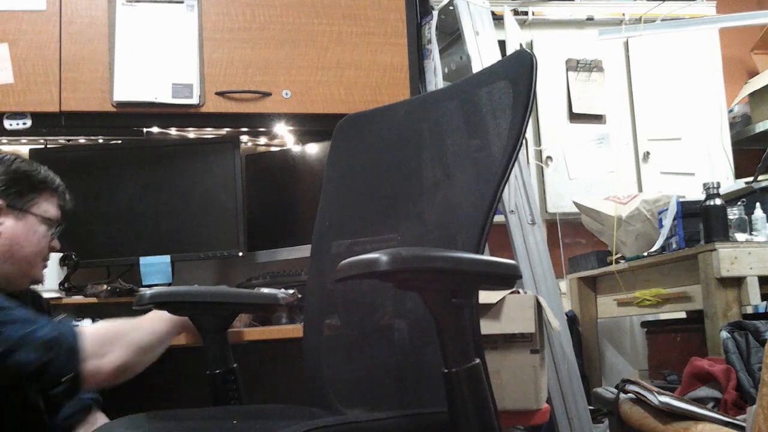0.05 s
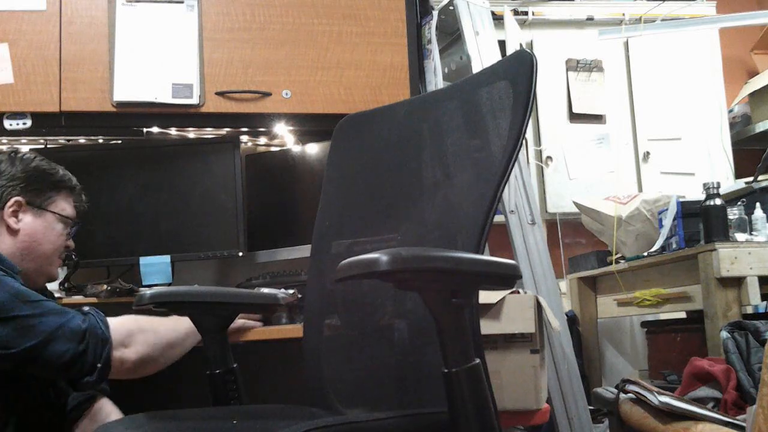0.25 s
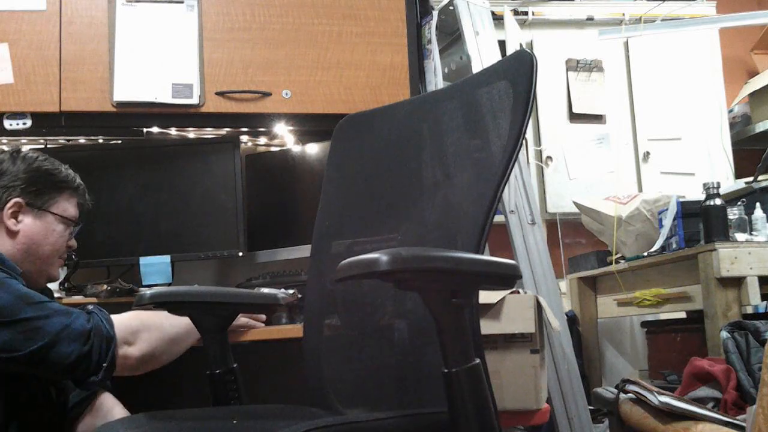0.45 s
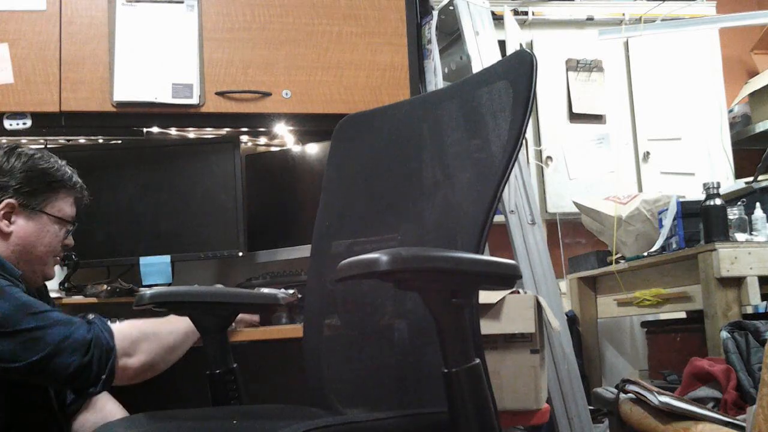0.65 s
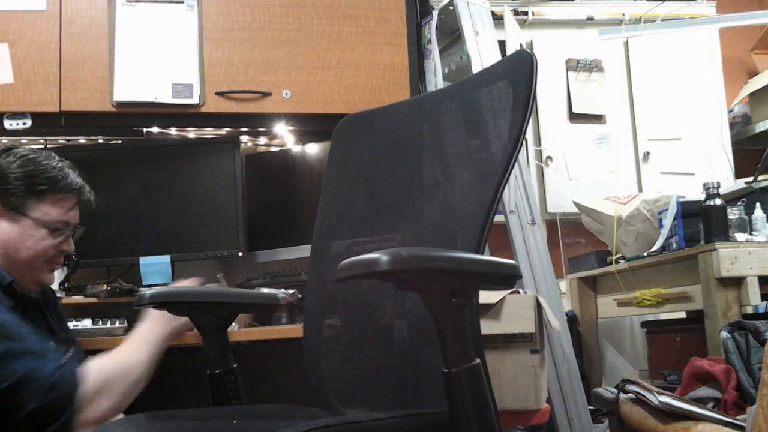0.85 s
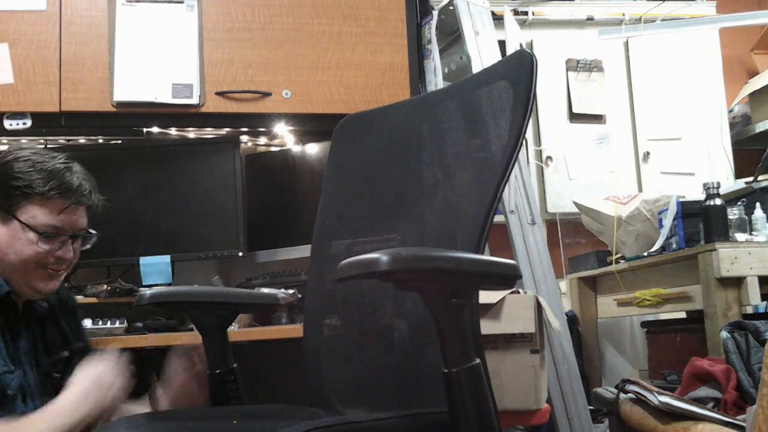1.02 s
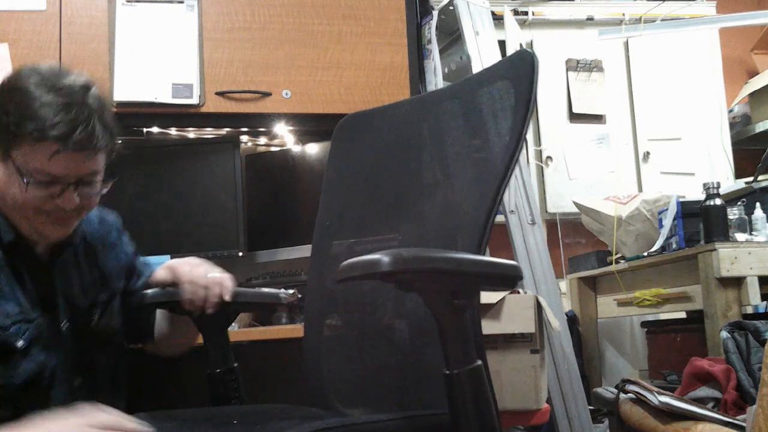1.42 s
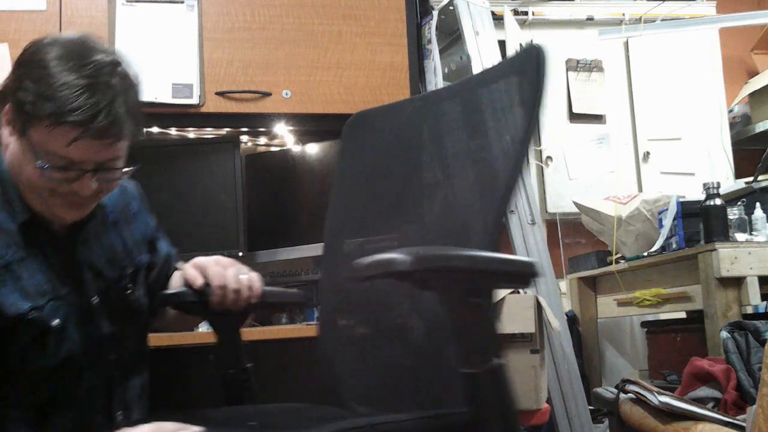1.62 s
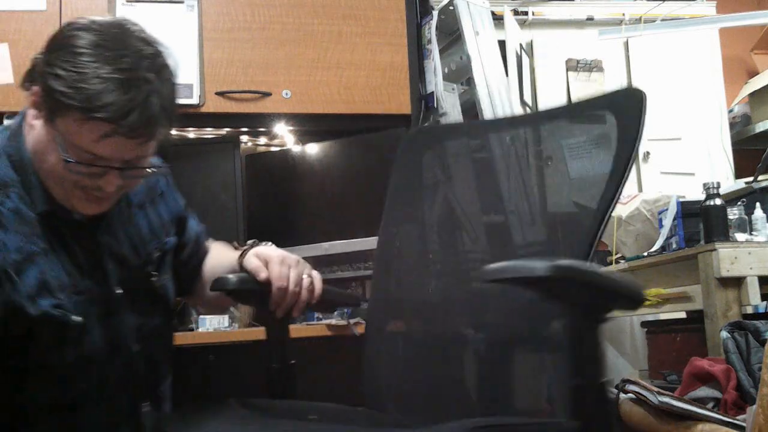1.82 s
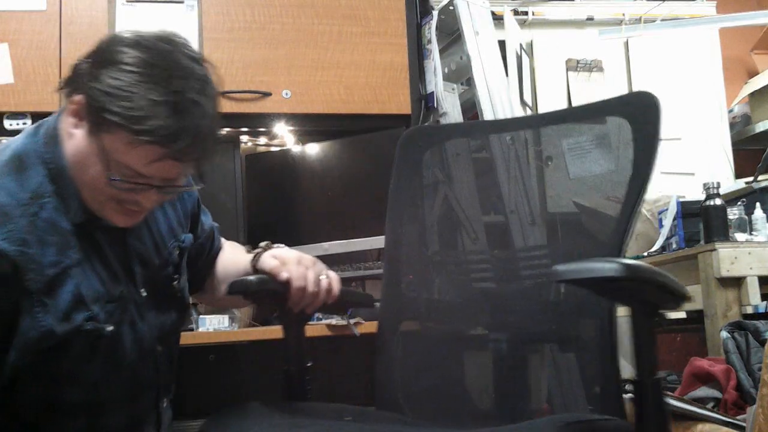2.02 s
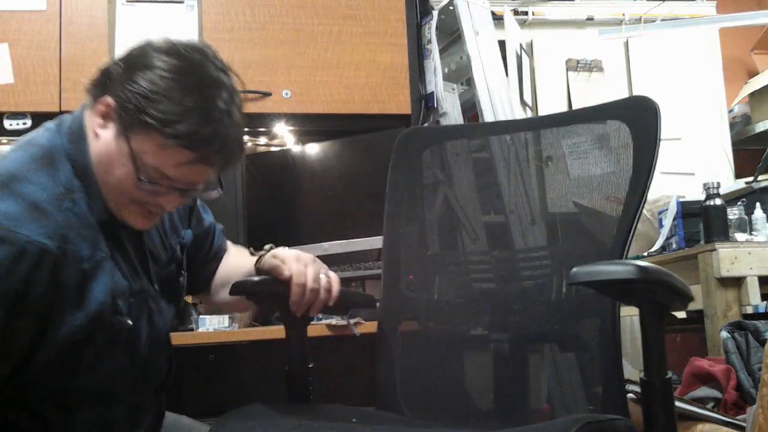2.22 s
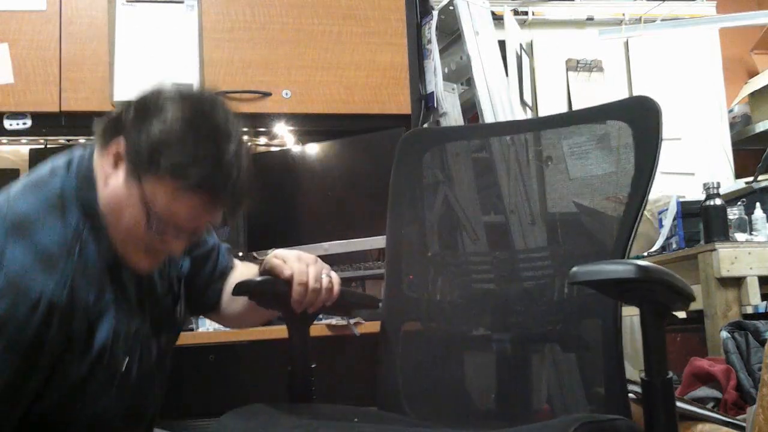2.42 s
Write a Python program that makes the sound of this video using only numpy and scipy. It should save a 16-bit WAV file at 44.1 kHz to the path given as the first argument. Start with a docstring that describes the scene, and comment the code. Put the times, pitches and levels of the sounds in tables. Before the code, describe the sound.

Office chair knocking and rattling as it is shoved, following a few thumps nearby.

```python
"""A wheeled office chair is handled in a small, cluttered workshop. First something thumps and clatters
down by the desk; then a hand grabs the hollow armrest, the loose frame clunks as the chair is shoved,
and it knocks hard with a metal clink. Each clunk is a dull crack, a rattle and a ringing body, with a
short room tail. The casters roll briefly over grit and rumble through the floor, over quiet room air."""
import sys
import numpy as np
from scipy import signal
from scipy.fft import rfft, irfft
from scipy.io import wavfile

SR = 44100
rng = np.random.default_rng(int(sys.argv[2]) if len(sys.argv) > 2 else 0)


def transcribe(u):
    """Save the signal u as a 16-bit wav file named by the first command-line argument.

    u: samples, shape (n,) or (channels, n), limited to [-1, 1]; the rate is SR.
    q: integer samples, one column per channel.
    """
    v = np.clip(np.atleast_2d(u).T, -1, 1)
    q = np.round(v * 32767).astype(np.int16)
    wavfile.write(sys.argv[1], SR, q)


N = 112454

# resonances of the chair frame (frequency [Hz], level [dB], t60 [s])
CHAIR_MODES = [(127.3, -8, 0.26), (301.8, -1, 0.46), (344, -8.5, 0.43), (416, -2.5, 0.58),
               (492.6, -6.5, 0.42), (519, 0.5, 0.41), (645.5, 0.5, 0.41), (825, -0.5, 0.41),
               (1320, -12, 0.63), (1470, -3, 0.21), (1587, -6.5, 0.15), (1784, -9.5, 0.35),
               (1893, -8.5, 0.33)]


def chair_clunks():
    """The loose frame knocks, rattles and rings as the chair is grabbed and shoved."""
    # (time [s], level [dB], bass [dB], treble [dB], favoured pitch [Hz], crack [dB])
    hits = [(1.4815, -45.5, -23, -0.5, 1590, 18), (1.573, -58, -7, 7.5, 1490, 13.5),
            (1.639, -56.5, -2.5, 9, 1500, 19), (1.659, -32.5, -30, -11, 1520, 18.5),
            (1.675, -38, -20.5, -6.5, 664, 24), (1.693, -39, -8.5, -10, 627, 28),
            (1.746, -40, -15.5, 4, 1500, 21), (1.7605, -30, -15.5, -3, 996, 20.5),
            (1.773, -39.5, -12.5, -0.5, 583, 29), (1.797, -38, 1.5, 2.5, 443, 23.5),
            (1.809, -46.5, 3.5, -6, 504, 31.5), (1.8695, -30.5, 1, 4.5, 1525, 21),
            (1.876, -33.5, 5, 11, 333, 21), (1.884, -31, 1, 7, 708, 21.5),
            (1.908, -35.5, -4.5, -8, 538, 28.5), (1.957, -38.5, 0.5, 3.5, 667, 20.5),
            (1.983, -39.5, 1.5, 3, 645, 21.5), (2.068, -39.5, 1.5, -22, 516, 25.5),
            (2.099, -38.5, -4, -25, 427, 19), (2.337, -50, 2.5, -2.5, 612, 13),
            (2.356, -53.5, 7.5, 4, 745, 14), (2.474, -58.5, -6, 4.5, 1530, 15)]
    # tone of a knock on the frame (frequency [Hz], level [dB])
    body_eq = [(40, -12.5), (85, -32), (200, -1), (330, 0.5), (560, 3), (880, -1.5), (1200, -6),
               (1620, -5.5), (2150, -17), (2700, -21), (3050, -32.5), (3700, -35), (5000, -60),
               (7500, -61.5)]
    return blows(hits, body_eq, CHAIR_MODES, rattle_db=-6, rattle_s=0.028,
                 room_db=-6, t60_scale=0.93, modes_db=-12)


def armrest():
    """The hollow armrest rings when the hand lands on it and again when it is shoved."""
    # armrest resonances (frequency [Hz], level [dB], t60 [s])
    modes = [(734, -9, 0.58), (885, 0, 0.45), (960, -2.5, 0.2), (1610, -9, 0.17)]
    # grab and shove (time [s], level [dB])
    knocks = [(1.4817, -46.5), (1.7606, -38)]
    out, t = np.zeros(N), np.arange(SR) / SR
    for at, db in knocks:
        add(out, undb(db) * ring(modes, t), at)
    return out


def clink(level_db=-60.5, jangle_db=15, jangle_t60=0.27, size=22050):
    """The metal of the chair's mechanism rings and jangles briefly at the hardest knock."""
    # resonances of the metal and, near 2790 and 3320 Hz, of the plastic frame (frequency [Hz], level [dB], t60
    # [s])
    modes = [(2344, 11.5, 0.37), (2710, 11.5, 0.25), (2790, 9, 0.14), (3320, 6.5, .28), (3630, 0.5, 0.22),
             (7130, -3, 0.24), (7800, -9.5, 0.22)]
    # bright tone of the jangle (frequency [Hz], level [dB])
    jangle_eq = [(1400, -10.5), (2400, 10), (3050, -4), (3600, -0.5), (5000, -25), (7100, -12), (8400, -21)]
    out, t = np.zeros(N), np.arange(size) / SR
    jangle = colour(rng.standard_normal(N), jangle_eq)[:size] * decay(t, jangle_t60)
    metal = ring(modes, t, detune=0.00058) + undb(jangle_db) * jangle
    attack = 1 - np.exp(-t / 0.0013)
    add(out, undb(level_db) * metal * attack, at=1.872)
    return out


def casters(bumps_per_s=160, spread_db=2, modes_db=-15, size=16384):
    """The wheels run over grit; each bump rings the frame and the room."""
    # swell of the roll (time [s], level [dB])
    swell = [(1.48, -63), (1.72, -52), (1.86, -53), (1.98, -45), (2.11, -49), (2.24, -58), (2.28, -57.5),
             (2.35, -50.5), (2.43, -58.5), (2.55, -74)]
    # tone of the wheels (frequency [Hz], level [dB])
    wheel_eq = [(60, -16.5), (140, -8), (300, -3.5), (520, -0.5), (800, 4), (1150, -12), (1600, -8),
                (2600, -25), (8000, -64.5)]
    t = np.arange(size) / SR
    grit = rng.random(N) < bumps_per_s / SR
    bumps = grit * undb(spread_db * rng.standard_normal(N)) * rng.choice([-1, 1], N)
    rolling = colour(signal.fftconvolve(bumps, reflections(t, t60_scale=0.44))[:N], wheel_eq)
    frame = unit(signal.fftconvolve(bumps, ring(CHAIR_MODES, t))[:N])
    return (rolling + undb(modes_db) * frame) * fader(swell)


def floor_rumble():
    """The floor rumbles under the rolling chair."""
    # swell of the rumble (time [s], level [dB])
    swell = [(1.66, -83), (1.70, -58), (1.78, -58.5), (1.85, -65), (1.885, -47), (1.93, -42.5), (1.99, -52),
             (2.17, -60), (2.26, -71.5)]
    # sub-bass tone of the floor (frequency [Hz], level [dB])
    floor_eq = [(15, -10.5), (28, 3), (47, 5), (80, -13.5), (200, -66)]
    return colour(rng.standard_normal(N), floor_eq) * fader(swell)


def desk_clatter():
    """Something lands by the desk: bassy thumps, then a run of brighter knocks."""
    # (time [s], level [dB], bass [dB], treble [dB], favoured pitch [Hz], crack [dB])
    hits = [(.213, -41.5, 12.5, -17, 293, 12.5), (.223, -37, 10, -25, 628, 11.5),
            (.238, -38.5, 4, -19, 290, 10), (.284, -44, 13.5, -5.5, 322, 15),
            (.3445, -34.5, 2.5, 2, 705, 5), (.362, -36, -5.5, 5.5, 723, 8), (.392, -33, -4, 0.5, 810, 11),
            (.396, -37.5, -6.5, 0, 521, 23.5), (.402, -30.5, -12.5, 5.5, 497, 24),
            (.410, -32, -10.5, 9, 1010, 25.5), (.428, -44.5, -10, 4.5, 726, 28.5),
            (.483, -47.5, -6, 6, 1570, 16), (.507, -43, -6.5, -0.5, 890, 18),
            (.535, -44.5, -1, 5, 910, 11.5), (.925, -58, -4.5, -8, 493, 6)]
    # tone of a knock by the desk (frequency [Hz], level [dB])
    body_eq = [(40, -31.5), (140, -12), (300, -12.5), (480, -2.5), (750, 1), (1080, -3.5), (1270, -8.5),
               (1580, -5.5), (2050, -20.5), (2700, -23), (3200, -35.5), (4800, -56), (7500, -59.5)]
    # resonances of the clatter (frequency [Hz], level [dB], t60 [s])
    modes = [(283.6, -7.5, 0.29), (474, -2.5, 0.47), (702, -0.5, 0.35), (776, -3.5, 0.39),
             (862, -0.5, 0.39), (1008.4, -2, 0.41), (1090, -10, 0.41), (1512, -7, 0.26), (1601, -3, .33),
             (1870, -9, 0.25), (2645, -11, 0.4)]
    return blows(hits, body_eq, modes, rattle_db=-5.5, rattle_s=0.009,
                 room_db=-4.5, t60_scale=1.1, modes_db=-14.5)


def blows(hits, body_eq, modes, rattle_db, rattle_s, room_db, t60_scale, modes_db, size=32768):
    """Each blow: a dull crack, a brief rattle of loose parts, ringing modes and the room's echoes."""
    out, t, hz = np.zeros(N), np.arange(size) / SR, np.arange(size // 2 + 1) * SR / size
    body = unit(undb(along_hz(body_eq, hz)))
    crack = causal(1 / np.sqrt(1 + (hz / 2830) ** 6))  # a click, low-passed at 2830 Hz
    attack = 1 - np.exp(-(t / 0.0025) ** 2)
    for at, db, *touch, crack_db in hits:
        echoes = undb(room_db) * reflections(t, t60_scale)
        rattle = undb(rattle_db) * rng.standard_normal(size) * np.exp(-t / rattle_s)
        tone = causal(body * undb(contact(hz, *touch, lift_db=7, octaves=0.27)))
        knock = irfft((undb(crack_db) * crack + rfft(echoes + rattle)) * tone)
        struck = [(f, level + contact(f, *touch, lift_db=11, octaves=0.13), t60) for f, level, t60 in modes]
        add(out, undb(db) * (knock + undb(modes_db) * ring(struck, t) * attack), at)
    return out


def contact(hz, bass_db, treble_db, centre_hz, lift_db, octaves, bass_hz=360, treble_hz=1340):
    """EQ in dB: a heavy contact adds bass, a hard one treble; the spot struck favours one pitch."""
    spot = lift_db * np.exp(-(np.log2(np.maximum(hz, 1) / centre_hz) / octaves) ** 2)
    return spot + bass_db / (1 + (hz / bass_hz) ** 4) + treble_db * hz ** 2 / (hz ** 2 + treble_hz ** 2)


def ring(modes, t, detune=0.0025):
    """Damped modes of alternating sign, slightly retuned on each blow."""
    out = np.zeros(len(t))
    for k, (hz, db, t60) in enumerate(modes):
        pitch = hz * (1 + detune * rng.standard_normal())
        out += (-1) ** k * undb(db) * decay(t, t60) * np.sin(2 * np.pi * pitch * t)
    return out


def reflections(t, t60_scale, bands=7):
    """Dense echoes of the room, dying band by band."""
    # room decay before scaling (frequency [Hz], t60 [s])
    room_t60 = [(100, 0.41), (400, 0.43), (900, 0.36), (2000, 0.4), (4000, 0.37), (8000, 0.057)]
    hz = np.arange(len(t) // 2 + 1) * SR / len(t)
    centres = np.geomspace(room_t60[0][0], room_t60[-1][0], bands)
    tail, noise = np.zeros(len(t)), rfft(rng.standard_normal(len(t)))
    for centre, share in zip(centres, np.eye(bands)):
        band = irfft(noise * along_hz(np.c_[centres, share], hz))
        tail += band * decay(t, t60_scale * along_hz(room_t60, centre))
    return tail


def room_air():
    """A quiet, dark bed of noise that drifts a little in level."""
    # room tone (frequency [Hz], level [dB])
    air_eq = [(15, 1), (75, -5), (130, -7), (250, -11), (450, -13.5), (750, -9.5), (1100, -18), (2000, -23),
              (3200, -29.5), (5000, -43), (7200, -40), (8500, -51)]
    # slow drift (time [s], level [dB])
    drift = [(0, -60), (1.4, -62), (2.55, -59)]
    return colour(rng.standard_normal(N), air_eq) * fader(drift)


def undb(db):
    """Decibels to gain."""
    return 10 ** (np.asarray(db) / 20)


def unit(x):
    """Scale to rms 1."""
    return x / np.sqrt(np.mean(x ** 2))


def decay(t, t60):
    """Envelope that falls 60 dB in t60 seconds."""
    return np.exp(-np.log(1000) * t / t60)


def along_hz(points, hz):
    """Read (frequency [Hz], value) points on a log-frequency axis."""
    f, v = np.array(points, float).T
    return np.interp(np.log(np.maximum(hz, 1)), np.log(f), v)


def fader(points):
    """Gain from (time [s], level [dB]) points; silent before the first."""
    return undb(np.interp(np.arange(N) / SR, *np.array(points).T, left=-np.inf))


def add(out, x, at):
    """Mix x into out from a time on."""
    i = int(at * SR)
    out[i:i + len(x)] += x[:N - i]


def colour(x, eq):
    """Shape a steady sound by an EQ curve; rms 1."""
    hz = np.arange(N // 2 + 1) * SR / N
    return unit(irfft(rfft(x) * undb(along_hz(eq, hz)), N))


def causal(gain):
    """Minimum-phase response with the given magnitudes."""
    c = irfft(np.log(gain + 1e-9))
    half = len(c) // 2
    return np.exp(rfft(np.r_[c[0], 2 * c[1:half], c[half], np.zeros(half - 1)]))


def scene():
    """Clatter, chair and room air, mixed in mono."""
    return (desk_clatter() + chair_clunks() + room_air()
            + armrest() + clink() + casters() + floor_rumble())[None]


def record(dry):
    """The microphone cuts off steeply above 8300 Hz."""
    return signal.sosfilt(signal.ellip(8, .2, 70, 8300, fs=SR, output="sos"), dry)


dry = scene()
out = record(dry)
transcribe(out)
```